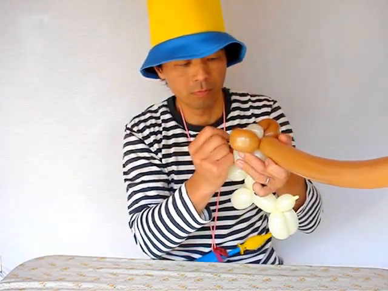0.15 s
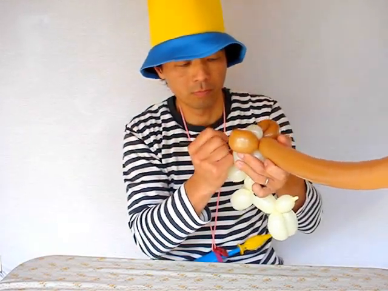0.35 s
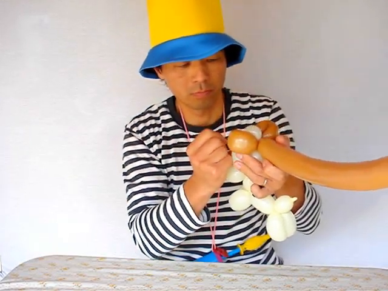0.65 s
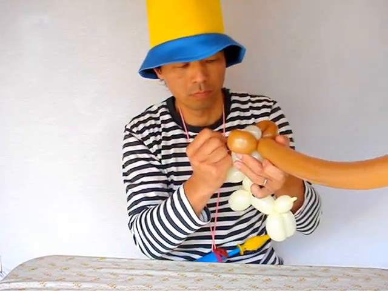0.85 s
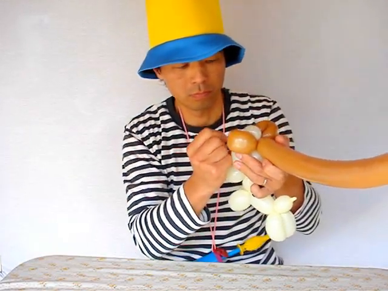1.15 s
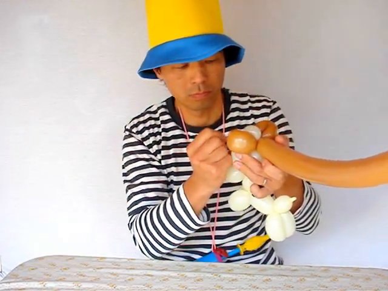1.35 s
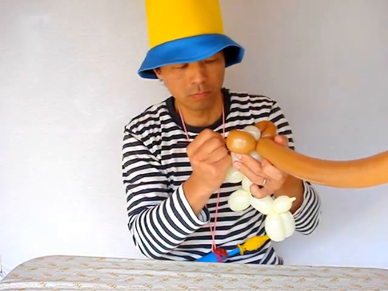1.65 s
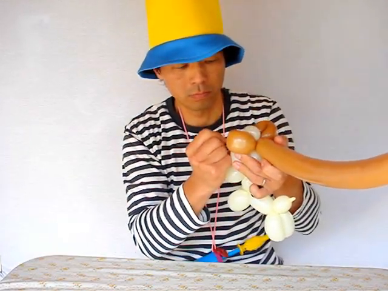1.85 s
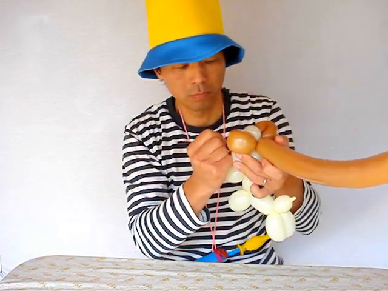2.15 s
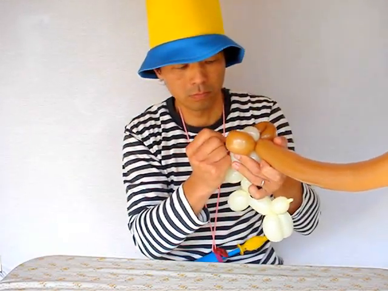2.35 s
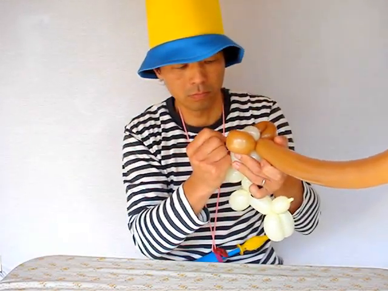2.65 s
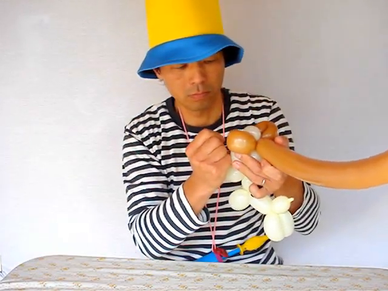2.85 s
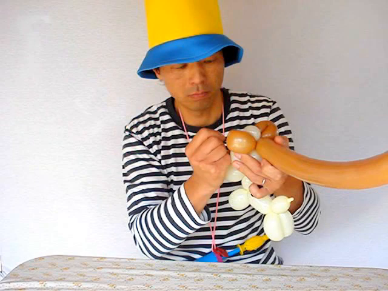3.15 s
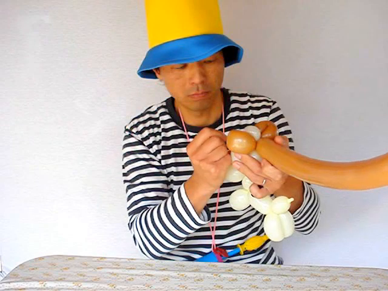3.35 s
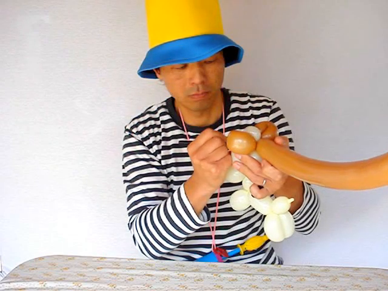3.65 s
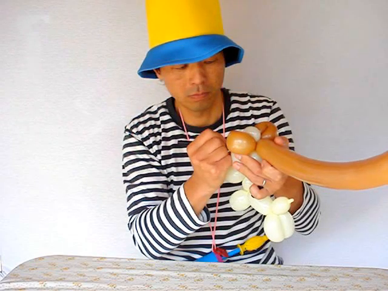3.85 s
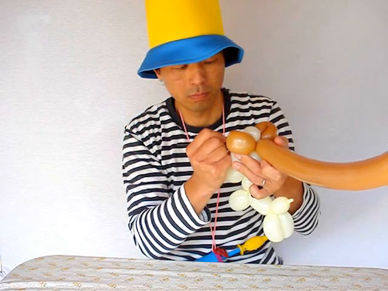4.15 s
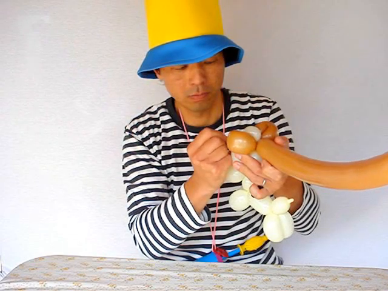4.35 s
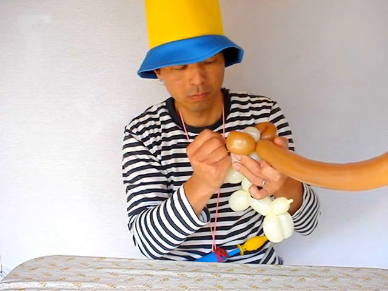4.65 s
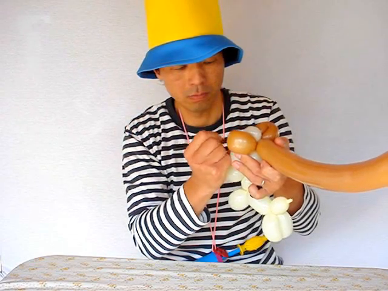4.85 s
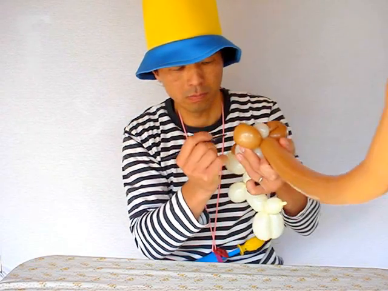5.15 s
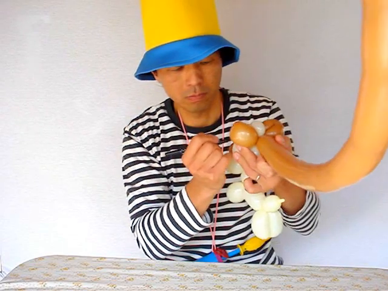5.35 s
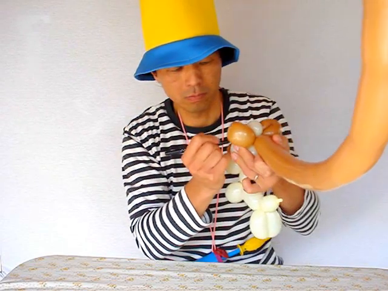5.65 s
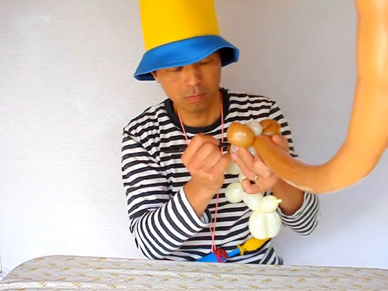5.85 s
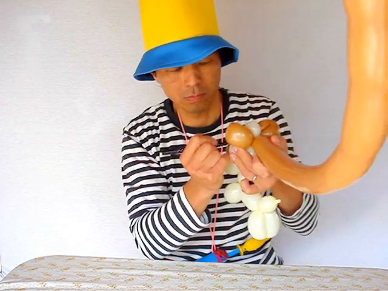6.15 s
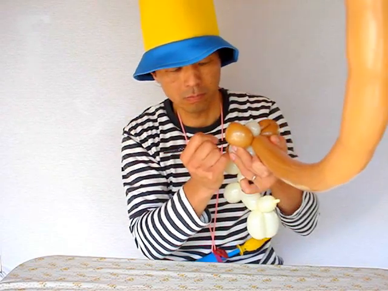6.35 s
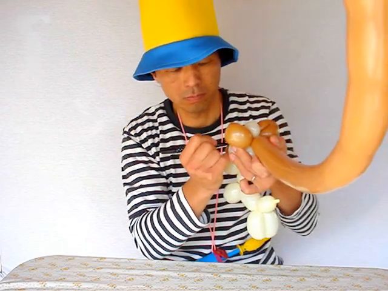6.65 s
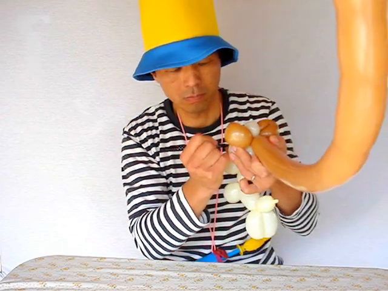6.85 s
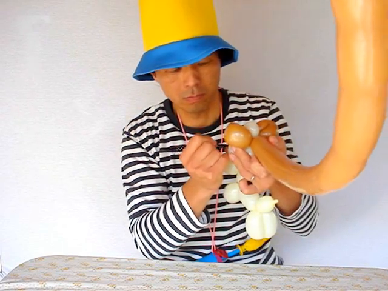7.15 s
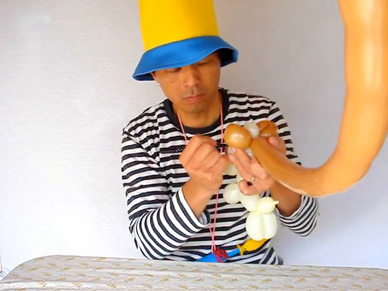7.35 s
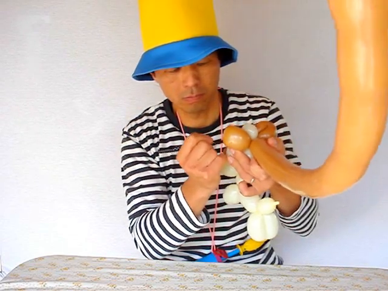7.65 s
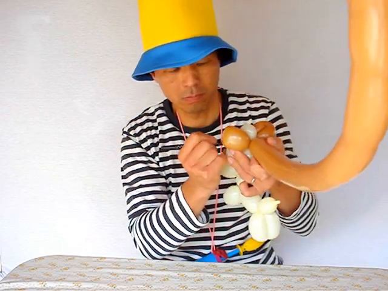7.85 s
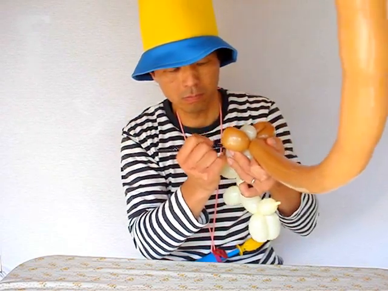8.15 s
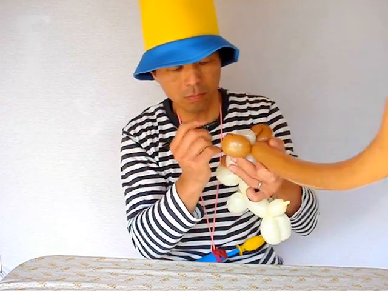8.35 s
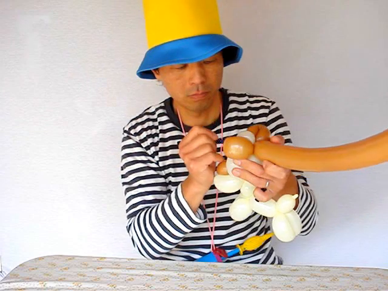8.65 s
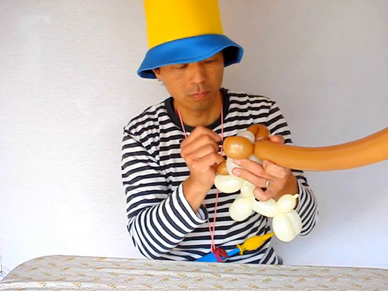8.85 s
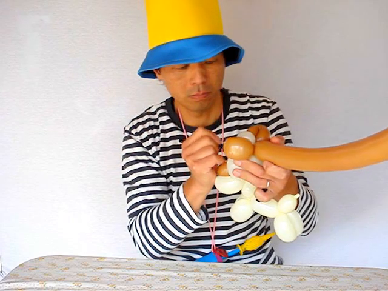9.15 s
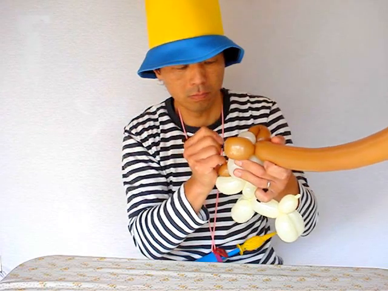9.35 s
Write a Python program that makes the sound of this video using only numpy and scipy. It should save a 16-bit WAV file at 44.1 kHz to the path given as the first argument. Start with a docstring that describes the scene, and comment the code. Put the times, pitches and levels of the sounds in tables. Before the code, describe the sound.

Short rubbery squeaks and rasping creaks come in scattered bunches as a marker draws on a balloon, over soft room hush.

```python
"""In a small quiet room, a felt marker draws short strokes on a blown-up latex balloon.
The tip sticks and slips on the rubber, and every slip kicks the tight skin and makes it ring.
Slow drags creak and rasp, quick flicks squeak in arching glides, and a few times the tip taps the skin.
Behind it lie a soft room hush and a thin electronic whine."""
import sys
import numpy as np
from scipy import signal
from scipy.fft import rfft, irfft
from scipy.io import wavfile
from scipy.ndimage import uniform_filter1d

SR = 44100
rng = np.random.default_rng(int(sys.argv[2]) if len(sys.argv) > 2 else 0)


def to_wav(s):
    """Save 16-bit WAV."""
    ch = np.atleast_2d(s).T  # columns
    pcm = np.round(np.clip(ch, -1, 1) * 32767)  # PCM
    wavfile.write(sys.argv[1], SR, pcm.astype(np.int16))


N = 419252

# Quick flicks of the marker; the pitch glides from first to top to last:
# start_s, rise_s, fall_s, first_hz, top_hz, last_hz, peak_db, attack_s, fade_db, roughness (0 to 1)
FLICKS = [(0.327, 0.016, 0.038, 1390, 1418, 1373, -41.0, 0.041, 10, 0.12),
          (1.834, 0.036, 0.045, 856, 1737, 1056, -35, 0.012, 9.5, 0.15),
          (1.917, 0.033, 0.013, 1174, 1383, 1400, -44.5, 0.003, 7.5, 0.1),
          (2.121, 0.018, 0.0011, 1658, 1948, 1760, -40.5, 0.021, 1, 0),
          (2.293, 0.044, 0.066, 412.6, 1690, 1144, -32.5, 0.04, 17, 0.46),
          (2.459, 0.012, 0.013, 850, 838, 950, -37, 0.04, 7, 0.15),
          (2.482, 0.039, 0.016, 1360, 2606, 2420, -34, 0.0061, 4.5, 0.15),
          (2.613, 0.011, 0.0046, 2700, 3115, 2990, -47.5, 0.008, 5, 0.07),
          (2.658, 0.0094, 0.029, 2100, 1548, 1504, -44, 0.003, 3, 0.32),
          (2.731, 0.025, 0.047, 1554, 2547, 1297, -35, 0.0047, 9, 0.2),
          (4.459, 0.026, 0.034, 1292, 1851, 1620, -35.5, 0.02, 19, 0.4),
          (4.575, 0.005, 0.009, 1375, 1414, 1400, -49, 0.002, 6, 0.33),
          (4.623, 0.033, 0.037, 1313, 2430, 870, -36, 0.0088, 8, 0.13),
          (4.73, 0.018, 0.047, 766, 920, 563, -33.5, 0.01, 5, 0.08),
          (5.82, 0.011, 0.023, 1188, 1564, 982, -40, 0.0027, -2.5, 0.39),
          (6.09, 0.06, 0.06, 2610, 2870, 2600, -62.5, 0.05, 7, 0.67),
          (6.419, 0.047, 0.012, 1270, 2740, 3000, -37, 0.012, 0, 0.02),
          (6.64, 0.038, 0.04, 1890, 2526, 1350, -31, 0.012, 7, 0.08),
          (6.854, 0.028, 0.054, 1605, 2866, 2990, -29.5, 0.023, 9.5, 0),
          (7.012, 0.034, 0.0063, 1927, 3190, 3230, -32, 0.021, 20, 0.06),
          (7.168, 0.033, 0.05, 3000, 3223, 1330, -37, 0.0092, 18.5, 0.06),
          (7.297, 0.024, 0.011, 988, 3150, 3310, -29.0, 0.018, 20, 0.04),
          (7.402, 0.019, 0.065, 1195, 2286, 974, -26.5, 0.048, 13.5, 0),
          (7.957, 0.008, 0.011, 2450, 2420, 2380, -48, 0.0067, 9, 0.13),
          (8.167, 0.0048, 0.029, 1835, 1598, 1626, -41, 0.017, 8, 0.1),
          (9.145, 0.0087, 0.025, 1566, 1594, 1610, -44, 0.0054, 14, 0.24),
          (9.395, 0.014, 0.025, 1087, 1103, 1090, -41.5, 0.018, 8, 0.2),
          (9.403, 0.0095, 0.0018, 3190, 3820, 3870, -37.5, 0.0023, 0.5, 0.08),
          (9.412, 0.012, 0.027, 1286, 1223, 1220, -39, 0.0023, 9, 0.25)]
# Slow drags, each a list of points; the pitch is the slips per second: time_s, pitch_hz, level_db
DRAGS = [
    [(.718, 655, -37), (.746, 553, -39.5), (.775, 573.4, -36.5), (.800, 652, -41), (.836, 631.5, -35.5),
     (.862, 735, -36), (.912, 472, -46.5), (.955, 587.5, -37.5), (.988, 519, -41.5)],
    [(1.433, 807, -39), (1.445, 726.4, -39.5), (1.489, 723.4, -41), (1.556, 768, -35), (1.588, 686, -45),
     (1.625, 692, -43.5), (1.675, 616, -51.5)],
    [(3.497, 545, -43), (3.529, 719, -37), (3.560, 583, -39.5), (3.599, 874, -36.5), (3.619, 907, -36),
     (3.642, 721, -36), (3.708, 771, -40), (3.765, 733, -53)],
    [(3.965, 541, -40), (4.015, 725, -35.5), (4.055, 571.6, -35.5), (4.116, 843, -33.5),
     (4.136, 446, -37.5), (4.162, 462, -37), (4.188, 657, -37.5), (4.222, 576, -41.5), (4.276, 532, -48)],
]
# The grip of each drag, before its slowness makes it rougher: roughness (0 to 1)
DRAG_ROUGHNESS = [0.29, 0.041, 0.053, 0.098]
# Taps of the tip on the skin: start_s, relative_level_db
TIP_TAPS = [(2.295, -16.5), (4.882, -30), (4.947, -30), (9.343, -48)]
# Broad resonances, the pitches at which the skin likes to ring: pitch_hz, width_hz, gain_db
SKIN_RINGS = [(443, 190, 0.5), (863, 118, 5), (1060, 232, 2.5), (1918, 228, 3.5), (2088, 214, 7),
              (2857, 1750, -2), (5100, 198, -0.5), (5290, 1830, -6.5), (8500, 1300, -19)]
# Narrow peaks and dips from the room's echoes, which make a gliding squeak swell and dip:
# pitch_hz, width_hz, gain_db
ROOM_PEAKS_AND_DIPS = [(1137, 83, 3.5), (1397, 100, 4), (1613, 160, 5.5), (1820, 57, 3), (1970, 56, 3),
                       (2256, 380, -3.5), (2710, 120, 2), (3060, 90, 2), (4100, 400, -3)]
# Echoes from nearby surfaces (chest, table, wall): delay_s, gain_db
NEAR_ECHOES = [ (.00159, -13), (.003015, -8), (.00442, -14), (.0089, -7.5)]
# The tone of the room hush, from bass to treble: frequency_hz, relative_level_db
HUSH_SHAPE = [(15, -46), (25, -18), (75, -10), (140, -5.5), (226, -3), (445, -4.5), (790, -7.5),
              (1270, -10), (1850, -14), (4000, -19), (6800, -23.5), (8300, -23.5), (9900, -28)]

LEAD_S, LIFT_S = .004, .02   # extra time before and after each stroke


def marker():
    """All the strokes, swelling and dipping as they cross the peaks and dips from the room's echoes."""
    creaks = [creak(curve, rough) for curve, rough in zip(DRAGS, DRAG_ROUGHNESS)]
    squeaks = [squeak(*flick) for flick in FLICKS]
    out = np.zeros(N + SR)
    for first, sound in creaks + squeaks:
        out[first:first + len(sound)] += sound
    for hz, width_hz, db in ROOM_PEAKS_AND_DIPS:
        out = out + (from_db(db) - 1) * resonance(out, hz, width_hz)
    return out[:N]


def squeak(start_s, rise_s, fall_s, first_hz, top_hz, last_hz, peak_db, attack_s, fade_db, rough):
    """A quick flick: the slips speed up and slow again while the pressure builds and eases."""
    held_s = rise_s + fall_s
    t = stroke_time(held_s)
    up, down = np.clip([t / rise_s, (t - rise_s) / fall_s], 0, 1)
    eased_up = (up + np.sin(np.pi / 2 * up) ** 2) / 2
    pitch = first_hz + (top_hz - first_hz) * eased_up + (last_hz - top_hz) * down ** 1.9
    level_db = peak_db + np.interp(t, [0, attack_s, max(held_s, attack_s + LEAD_S)], [-9, 0, -fade_db])
    # the grip breaks up where the speed changes fast
    octaves_per_s = np.abs(np.gradient(np.log2(pitch))) * SR
    rough = rough + .0024 * octaves_per_s
    # the tip catches and lets go, so pitch and loudness flutter together
    flutter = waver(len(t), hz=127)
    return stroke(start_s, pitch * (1 + .016 * flutter), level_db + 2.13 * flutter, rough, held_s)


def creak(curve, rough):
    """A slow drag whose speed and pressure wander."""
    times, hz, db = np.transpose(curve)
    held_s = times[-1] - times[0]
    t = times[0] + stroke_time(held_s)
    return stroke(times[0], np.interp(t, times, hz), np.interp(t, times, db), rough, held_s)


def stroke(start_s, pitch, level_db, rough, held_s,
           rasp_hz=347, firm_db=-35.5, fast_hz=2600, grip_s=.008, release_s=.0036):
    """The tip grips, slips along the skin and lifts. Returns the starting sample and the sound."""
    t = np.arange(len(pitch)) / SR
    # slow slips rasp: fully rough at rasp_hz, steadier above it
    rough = np.clip(rough + (rasp_hz / pitch) ** 2.22, 0, 1)
    # the rubber's grip varies, so the pitch is never quite steady
    pitch = pitch * (1 + .028 * np.sqrt(rough) * waver(len(t), hz=101))
    kicks = slips(pitch, rough)
    # firmer strokes give sharper kicks
    soft = butter(kicks, 3800, "low", order=1)
    kicks = soft + (kicks - soft) * from_db(1.9 * (level_db - firm_db))
    # in a fast squeal the tip has no time to stick fully, so the kicks are rounder
    rounded = signal.sosfiltfilt(signal.butter(2, 8300, fs=SR, output="sos"), kicks)
    kicks = kicks + (rounded - kicks) * np.minimum(pitch / fast_hz, 1) ** 2
    voice = sing(skin(kicks), pitch, rough)
    # even out the voice, so the hand's pressure sets the loudness
    voice = voice / np.sqrt(uniform_filter1d(voice ** 2, size=353) + 1e-12)
    grip = np.clip(t / grip_s, 0, 1)
    release = np.exp(-np.maximum(t - LEAD_S - held_s, 0) / release_s)
    return int((start_s - LEAD_S) * SR), voice * grip * release * from_db(level_db)


def slips(pitch, rough, jitter=.14, memory=.85, uneven_db=6.5, scuff=.025, scuff_hz=1100):
    """One kick and a little hiss per slip; a rough grip makes the kicks uneven in time and strength."""
    cycles = np.cumsum(pitch) / SR
    samples = np.arange(len(pitch))
    slip_numbers = np.arange(int(cycles[-1]) + 1)
    time_chance, force_chance = rng.standard_normal((len(slip_numbers), 2)).T
    slip_rough = np.interp(slip_numbers, cycles, rough)
    # a late slip delays the next ones until the ringing skin pulls them back in step
    late = signal.lfilter([1], [1, -memory], jitter * slip_rough ** 1.5 * time_chance)
    position = np.interp(slip_numbers + late, cycles, samples)
    force = from_db(uneven_db * slip_rough * force_chance)
    # each kick is a short pulse (a sinc), so it can fall between samples
    nearby = position.astype(int)[:, None] + np.arange(-3, 5)
    offset = nearby - position[:, None]
    pulses = force[:, None] * np.sinc(offset) * np.sinc(offset / 4)
    kicks = np.zeros(len(samples))
    np.add.at(kicks, np.clip(nearby, 0, samples[-1]), pulses)
    # the rubbing hiss lasts as long as the slide and grows with its speed
    sliding = uniform_filter1d(np.abs(kicks), size=21) * 20 * np.sqrt(pitch / scuff_hz)
    return kicks + scuff * np.sqrt(rough) * sliding * rng.standard_normal(len(samples))


def skin(kicks, lowest_hz=238, highest_hz=10600):
    """The kicked skin rings; a small balloon gives off little bass, and latex dulls the treble."""
    rings = sum((-1) ** k * from_db(db) * resonance(kicks, hz, width_hz)
                for k, (hz, width_hz, db) in enumerate(SKIN_RINGS))
    return butter(butter(rings, lowest_hz, "high"), highest_hz, "low")


def sing(voice, pitch, rough, easiest_hz=1550, span_octaves=.57, boost=1.6):
    """The slips feed whichever overtone lies near the skin's easiest ring; a rough grip spoils this."""
    phase = 2 * np.pi * np.cumsum(pitch) / SR
    window = signal.get_window("hann", 256) / 128
    out = voice
    for k in (1, 2, 3):
        # a narrow filter that follows k times the pitch
        follower = np.exp(1j * k * phase)
        overtone = 2 * np.real(follower * signal.fftconvolve(voice / follower, window, "same"))
        nearness = np.exp(-.5 * (np.log2(k * pitch / easiest_hz) / span_octaves) ** 2)
        out = out + boost * nearness * (1 - rough) ** 2 * overtone
    return out


def taps(boost_db=17):
    """A touch of the tip kicks the skin once and thumps the air inside."""
    kicks = np.zeros(N)
    for start_s, db in TIP_TAPS:
        kicks[int(start_s * SR)] = from_db(db + boost_db)
    kicks = butter(kicks + 1e-18, 2500, "low", order=1)
    air_thump = from_db(3) * resonance(kicks, hz=300, width_hz=130)
    return skin(kicks) + air_thump


def stroke_time(held_s):
    """Seconds through a stroke, from just before the tip grips until it has lifted."""
    return np.arange(-LEAD_S, held_s + LIFT_S, 1 / SR)


def waver(length, hz):
    """A smooth random wobble of typical size 1; a higher hz makes it quicker."""
    warm_up = SR // 10
    return rms_one(butter(rng.standard_normal(length + warm_up), hz, "low")[warm_up:])


def resonance(x, hz, width_hz):
    """Ring at one pitch: sound at hz passes at full strength, the rest is weakened."""
    decay = np.exp(-np.pi * width_hz / SR)
    feed = np.array([1, 0, -1]) * (1 - decay ** 2) / 2
    feedback = [1, -2 * decay * np.cos(2 * np.pi * hz / SR), decay ** 2]
    return signal.lfilter(feed, feedback, x + 1e-18)


def butter(x, hz, kind, order=2):
    """Keep the sound below hz ("low") or above it ("high")."""
    return signal.sosfilt(signal.butter(order, hz, kind, fs=SR, output="sos"), x)


def from_db(db):
    """Turn decibels into a number to multiply by."""
    return 10 ** (np.asarray(db) / 20)


def rms_one(x):
    """Scale a signal so its average strength (rms) is 1."""
    return x / np.sqrt(np.mean(x ** 2) + 1e-20)


def room(x, build_s=.00082, fade_s=.27, wall_hz=6500, tail_db=-9.5):
    """The direct sound, a few close echoes and a short blurred tail that drops 60 dB in fade_s."""
    t = np.arange(SR // 2) / SR
    tail = butter(rng.standard_normal(len(t)), wall_hz, "low", order=1)
    build_up = 1 - np.exp(-(t / build_s) ** 2)
    tail *= build_up * np.exp(-np.log(1000) * t / fade_s)
    response = from_db(tail_db) * tail / np.linalg.norm(tail)
    response[0] += 1   # the direct sound
    for delay_s, db in NEAR_ECHOES:
        response[int(delay_s * SR)] += from_db(db)
    return signal.fftconvolve(x, response)[:N]


def hush(level_db=-54):
    """The room's soft, steady noise, strongest in the low tones."""
    hz, db = np.transpose(HUSH_SHAPE)
    frequencies = np.maximum(np.arange(N // 2 + 1) * SR / N, 1)
    shape = from_db(np.interp(np.log(frequencies), np.log(hz), db))
    noise = irfft(rfft(rng.standard_normal(N)) * shape, N)
    return from_db(level_db) * rms_one(noise)


def whine(pitch_hz=7575, restart_hz=30, level_db=-68.5):
    """Electronics give off a thin, high tone that restarts many times a second."""
    since_restart_s = np.arange(N) / SR % (1 / restart_hz)
    return from_db(level_db) * rms_one(np.sin(2 * np.pi * pitch_hz * since_restart_s))


def scene():
    """Marker and balloon in the room, over the hush and the whine, in one channel."""
    return (room(marker() + taps()) + hush() + whine())[None]


def record(dry):
    """Cut the treble steeply above 10000 Hz."""
    return signal.sosfilt(signal.ellip(10, .2, 70, 10000, fs=SR, output="sos"), dry)


dry = scene()
out = record(dry)
to_wav(out)
```